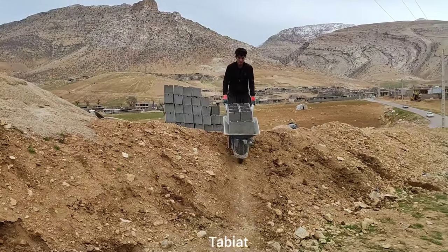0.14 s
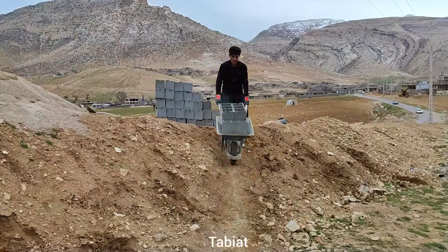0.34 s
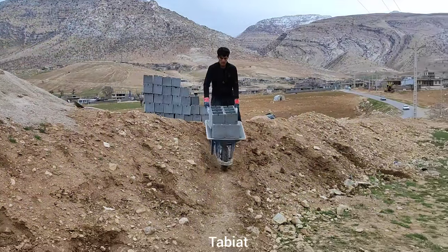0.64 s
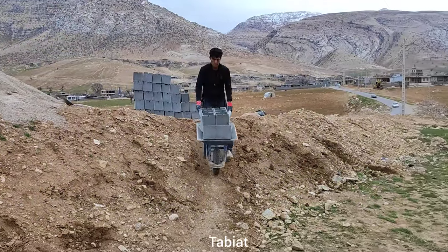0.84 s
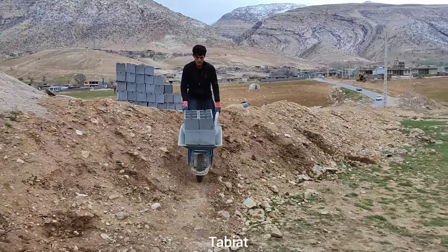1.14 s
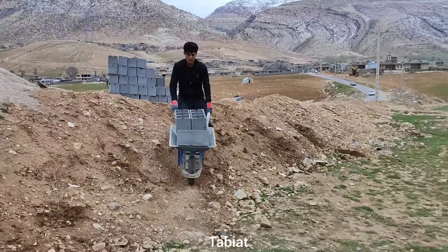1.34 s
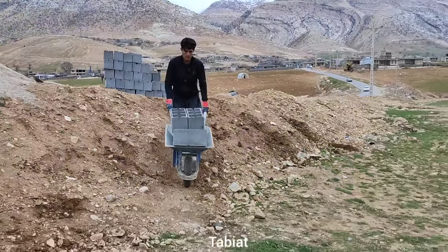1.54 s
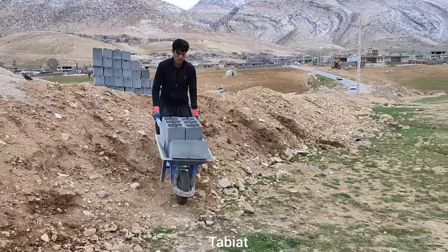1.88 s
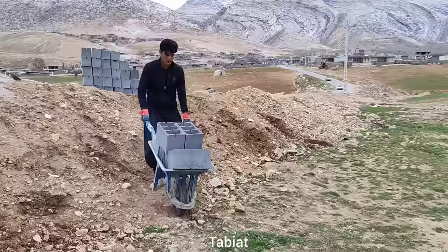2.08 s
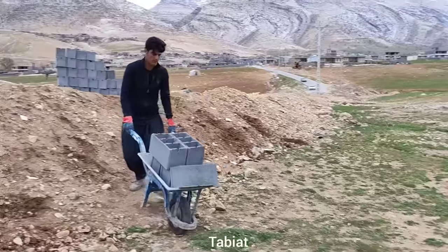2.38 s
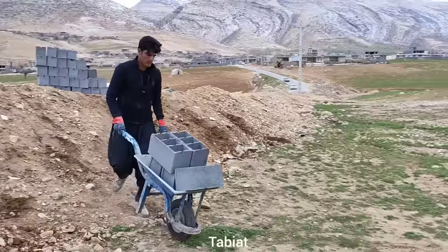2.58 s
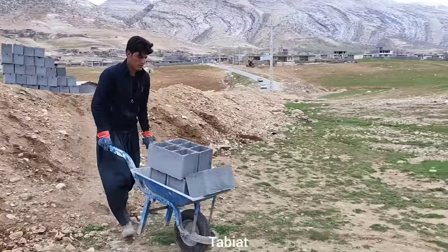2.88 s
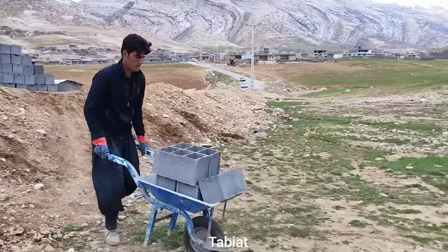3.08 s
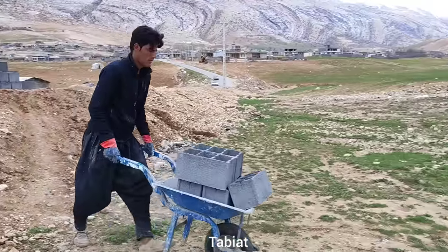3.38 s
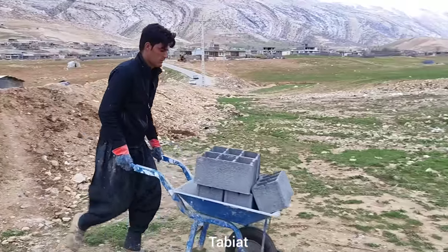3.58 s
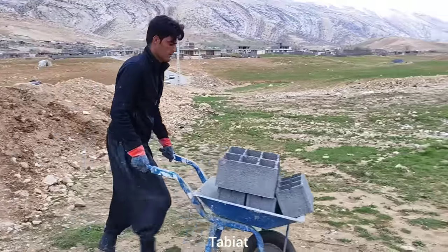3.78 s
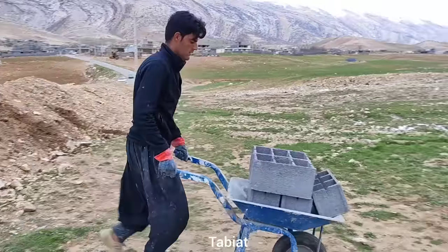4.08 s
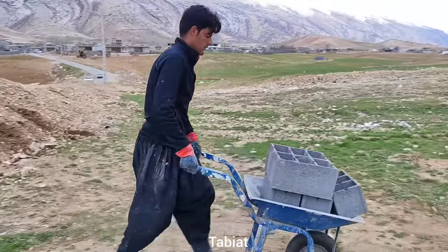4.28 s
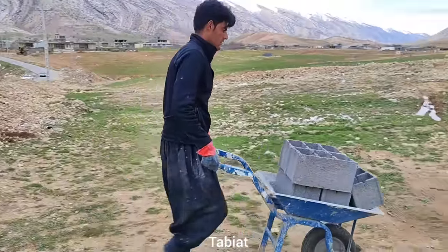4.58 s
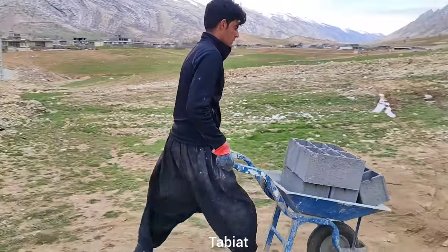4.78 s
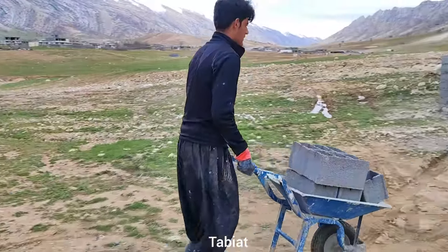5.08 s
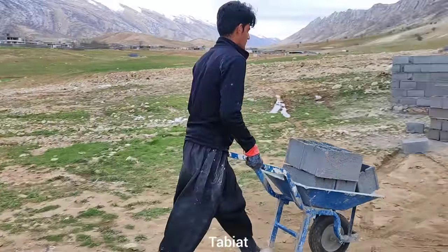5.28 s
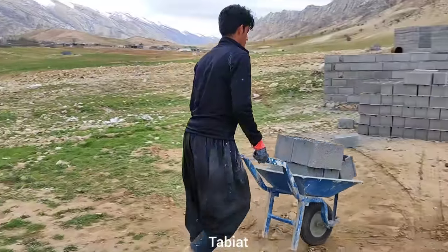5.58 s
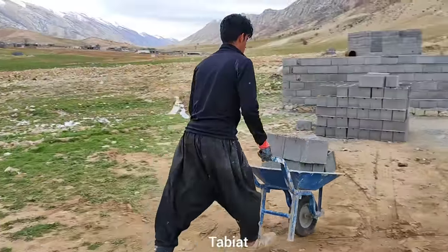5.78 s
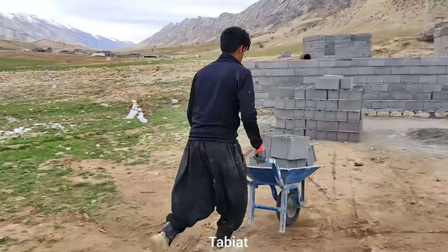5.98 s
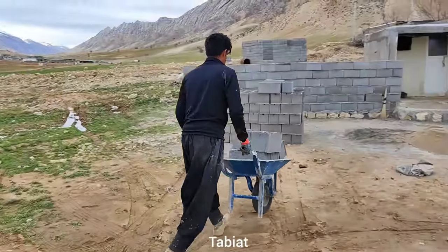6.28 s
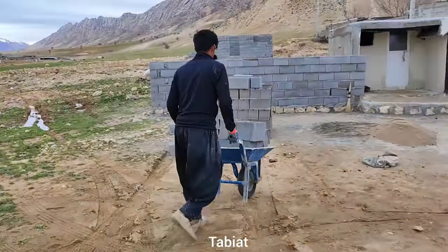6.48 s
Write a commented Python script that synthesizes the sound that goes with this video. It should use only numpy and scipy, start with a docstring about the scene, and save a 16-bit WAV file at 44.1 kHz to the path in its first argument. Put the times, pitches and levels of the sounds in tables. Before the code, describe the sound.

Outdoors in an open valley, a metal wheelbarrow of concrete blocks rolls over stony dirt. Blocks bang and grind in hard clusters early on, loudest just before three seconds with sharp grit snaps, then quieter rolling and shoe scuffs, a few knocks around four and a half, and a last clank at the end. Low wind thumps the right channel of a nearby handheld stereo microphone.

```python
"""On a windy dirt bank, a steel wheelbarrow full of concrete blocks is pushed down past the microphone.
The blocks grind, knock, rebound and rattle: noise bursts and ringing tones shake a model of the tray.
Grit snaps and scuffs under tyre and shoes as shaped noise, and a loose steel part pings as fading tones.
Gusts of noise buffet the right microphone port, over a faint open-air wash of slowly wavering noise."""
import sys
import numpy as np
from scipy import signal
from scipy.fft import rfft, irfft, next_fast_len
from scipy.io import wavfile
from scipy.ndimage import map_coordinates

SR = 44100
rng = np.random.default_rng(int(sys.argv[2]) if len(sys.argv) > 2 else 0)


def to_wav(sig):
    """Store sig (one row per channel, or 1-D mono) as 16-bit WAV at the path in sys.argv[1].

    Samples outside -1..1 are clipped; the rate is SR.
    """
    pcm = np.clip(np.atleast_2d(sig), -1, 1) * 32767
    pcm = np.round(pcm).astype(np.int16)
    wavfile.write(sys.argv[1], SR, pcm.T)  # frames by channels


N = 292506  # length in samples


def amp(db):
    """Turns dB into a plain factor."""
    return 10 ** (np.asarray(db) / 20)


def unit(x):
    """Scales to rms 1."""
    return x / np.sqrt(np.mean(x ** 2) + 1e-20)


def read(points, hz):
    """Reads a spectrum table on a log-frequency axis."""
    f, value = np.transpose(points)
    return np.interp(np.log(hz + 1), np.log(f + 1), value)


def curves(rows):
    """Draws each column of a time table as a line with a value at every sample."""
    s, *columns = np.transpose(rows)
    return [np.interp(np.arange(N) / SR, s, c) for c in columns]


def add(mix, s, sound):
    """Mixes a stereo sound in at time s."""
    start = max(round(s * SR), 0)
    part = mix[:, start:][:, :sound.shape[1]]
    part += sound[:, :part.shape[1]]


def drift(hz):
    """Slow random wandering of rms 1, up to about hz."""
    f = np.fft.rfftfreq(N, 1 / SR)
    slow = rfft(rng.standard_normal(N)) * np.exp(-(f / hz) ** 2)
    return unit(irfft(slow, N))


def fade(t, t60):
    """Exponential decay, 60 dB down at t60 seconds."""
    return np.exp(-np.log(1000) * t / t60)


# how alike the two microphone ports hear a sound: [f/Hz, likeness (1 = the same, 0 = unrelated)]
PORT_LIKENESS = [(50, .8), (300, .97), (700, .97), (1400, .7), (3000, .3), (6000, .1), (15000, .1)]


def colour(x, spectrum, tilt_db=0):
    """Gives two unrelated signals a spectrum and the likeness of the two ports; rms 1."""
    size = next_fast_len(x.shape[1])
    hz = np.fft.rfftfreq(size, 1 / SR)
    a, b = rfft(x, size)
    same = np.clip(read(PORT_LIKENESS, hz), -1, 1)
    mid, side = a * np.sqrt(1 + same), b * np.sqrt(1 - same)
    gain = amp(read(spectrum, hz) + tilt_db * np.log2(1 + hz / 1000))
    stereo = irfft(np.array([mid + side, mid - side]) * gain, size)
    return unit(stereo[:, :x.shape[1]])


def hiss(size, spectrum, tilt_db=0, ripple_db=0):
    """Coloured stereo noise; ripple gives each burst chance peaks and dips of its own."""
    knots = np.geomspace(200, SR / 2, num=90)
    ripple = np.interp(np.fft.rfftfreq(size, 1 / SR), knots, rng.standard_normal(len(knots)))
    noise = rfft(rng.standard_normal((2, size))) * amp(ripple_db * ripple)
    return colour(irfft(noise, size), spectrum, tilt_db)


def grains(per_s, spread_db):
    """Tiny impacts at random times and of random sizes."""
    size = amp(spread_db * np.minimum(rng.exponential(1, N), 4))
    happens = rng.random(N) < per_s / SR
    return size * happens * rng.standard_normal((2, N))


def patter(per_s, spread_db, t60):
    """The envelope of small random impacts, each dying away; rms 1."""
    hits = amp(spread_db * rng.standard_normal(N)) * (rng.random(N) < per_s / SR)
    return unit(signal.oaconvolve(hits, fade(np.arange(SR // 4) / SR, t60))[:N])


def ring(modes, t, scatter_db, detune=0):
    """One strike sets off fading tones of chance strength and pitch; high ones reach the ports out of step."""
    hz, db, t60 = np.transpose(modes)[:, :, None]
    share, sign, skew, shift = rng.standard_normal((4, len(hz), 1))
    strength = np.sign(sign) * amp(db + scatter_db * share)
    pitch = hz * (1 + detune * shift)
    waves = strength * fade(t, t60) * np.exp(2j * np.pi * pitch * t)
    # half of the phase gap between the ports
    half = np.sign(skew) * np.arccos(np.clip(read(PORT_LIKENESS, hz), -1, 1)) / 2
    return (np.exp(1j * half * [1, -1]).T @ waves).imag


# colour of the open-air wash: [f/Hz, relative level/dB]
AIR_COLOUR = [(20, -23.5), (100, 18.5), (250, 8), (430, -14), (800, 3.5), (1200, -1), (1900, -3),
              (2800, -24), (5000, -27.5), (10000, -32), (14500, -11.5)]
# strength of the wash before it wavers: [t/s, level/dB]
AIR_LEVEL = [(0, -48.5), (1.5, -46.5), (3, -47.5), (4.2, -50.5), (5.2, -54), (6, -46), (6.63, -50)]


def air(waver_db=1):
    """The distant wash of the open valley: noise whose level wavers slowly."""
    return amp(curves(AIR_LEVEL)[0] + waver_db * drift(hz=6.9)) * hiss(N, AIR_COLOUR)


# wind eddies at a port, before the wind speed shifts their pitch: [f/Hz, relative level/dB]
EDDIES = [(10, -31), (30, -12.5), (65, 2.5), (115, 2.5), (180, -2.5), (260, -12), (400, -25), (700, -34.5),
          (1500, -39), (4000, -100)]


def buffet(level_db, lumpy_db, quicken, pace):
    """Eddies cross one port; a stronger puff sweeps them by faster, so it is both louder and sharper."""
    puff = unit(amp(lumpy_db * drift(hz=131))) * amp(level_db)
    speed = pace * (puff / amp(-30)) ** quicken
    eddies = unit(hiss(N, EDDIES)[0])
    place = np.cumsum(speed) % (N - 1)
    return puff * map_coordinates(eddies, [place], order=1)


# wind strength at the right port, before its swells: [t/s, level/dB]
GUSTS = [(0, -37.5), (.13, -21), (.37, -34), (.46, -24), (.93, -29.5), (1.15, -23), (1.5, -34), (1.98, -31),
         (2.12, -48), (3.2, -43.5), (3.45, -36), (3.76, -38), (3.92, -32), (4.2, -52.5), (4.62, -45.5),
         (4.87, -32), (5.35, -27), (5.8, -28), (6.15, -24.5), (6.63, -27.5)]
# the hardest puffs within the gusts, before puff_db is added: [t/s, level over the gust/dB]
PUFFS = [(0.116, 4), (.272, 10.5), (0.5, 6), (5.177, 3.5), (5.251, 8.5), (6.026, 11), (6.144, 7.5),
         (6.18, 11.5), (6.253, 9.5), (6.342, 6.5)]
# weaker puffs come at random: how many per second, and level over the gust (dB, before puff_db)
EDDY_PUFFS_PER_S, EDDY_PUFF_DB = 4.9, 1.5
# the sheltered left port: level in a -30 dB gust (dB), share of the wind's swings that it follows
LEE_DB, LEE_FOLLOWS = -49, .3


def wind(right_db=0, swell_db=1.5, puff_db=5, puff_width=0.0016):
    """The right port faces the wind, more squarely as the microphone turns; the left is sheltered."""
    # [t/s, factor on the eddy speed]
    facing, = curves([(0, 0.76), (1.5, 1), (4, 1.), (5.2, 1.116), (6.1, 1.38), (6.63, 1.12)])
    t = np.arange(N) / SR
    gust_db = curves(GUSTS)[0] + swell_db * drift(hz=9)
    lee_db = LEE_DB + LEE_FOLLOWS * (gust_db + 30)
    left = buffet(lee_db, lumpy_db=2.5, quicken=0.15, pace=1.0)
    right = buffet(gust_db + right_db, lumpy_db=2.5, quicken=.28, pace=facing)
    weak = [(s, EDDY_PUFF_DB) for s in t[rng.random(N) < EDDY_PUFFS_PER_S / SR]]
    for s, db in PUFFS + weak:
        # a tight vortex passing the port: one pressure spike between two dips
        near = abs(t - s) < .02
        u = (t[near] - s) * facing[near] / puff_width
        spike = (1 - 2 * u ** 2) * np.exp(-u ** 2)
        right[near] += amp(gust_db[near] + db + puff_db) * spike
    return np.array([left, right])


# shoes landing: [t/s, level/dB before the clap fades]
STEPS = [(3.49, -35.5), (4.435, -24), (4.44, -24.5)]
# dull colour of a sole on earth: [f/Hz, relative level/dB]
SOLE = [(60, -14), (250, 4), (500, -24), (850, 0.5), (1400, -20), (2500, -22), (6000, -53), (14000, -58)]


def steps(t60=0.025):
    """Short dull claps of a sole on packed earth: noise bursts that fade fast."""
    out, t = np.zeros((2, N)), np.arange(SR // 8) / SR
    for s, db in STEPS:
        add(out, s, amp(db) * fade(t, t60) * hiss(len(t), SOLE))
    return out


# shoes scuffing through loose soil: [start t/s, length/s, level/dB at the middle, before flutter]
SCUFFS = [(1.46, 0.082, -49), (3.336, 0.15, -71), (3.58, .14, -54), (3.845, 0.13, -47.5),
          (4.544, 0.072, -65), (5.13, 0.076, -51.5), (5.311, 0.072, -51), (5.75, 0.27, -57)]
# colour of crushed grit, shared by scuffs, snaps and rolling: [f/Hz, relative level/dB before tilt]
GRIT = [(150, -3.5), (600, 3.5), (1500, 3.5), (2600, 4), (4500, 3.5), (6500, 4), (9500, -5), (12000, 3),
        (14500, -8)]


def scuffs(flutter_db=3):
    """A sole drags through loose soil: a swell of crushed grains."""
    t = np.arange(N) / SR
    drag = sum(amp(db) * np.sin(np.pi * np.clip((t - s) / length, 0, 1)) for s, length, db in SCUFFS)
    flutter = amp(flutter_db * drift(hz=40))
    soil = colour(grains(per_s=6500, spread_db=3.0), GRIT, tilt_db=-6.5)
    return drag * flutter * soil


# strikes on the loose steel part, before level_db is added: [t/s, level/dB]
PINGS = [(1.231, -51), (1.525, -50), (1.70, -47.5), (1.965, -47.5), (2.08, -52), (3.685, -47), (4.784, -38),
         (4.945, -54.5), (5.198, -39.5), (5.69, -54)]
# tones of the steel part: [f/Hz, relative level/dB, time to fade 60 dB/s]
STEEL = [(2330, 7, 0.26), (2345, 6, 0.18), (2514, 3, 0.17), (2710, 0, 0.071), (3000, 2, 0.069),
         (4000, -6, 0.087)]


def pings(scuff_t60=0.021, scuff_db=-17, level_db=-2):
    """A loose steel part is tapped and briefly rubbed: a click and a short scrape set off its tones."""
    out, t = np.zeros((2, N)), np.arange(SR // 3) / SR
    for s, db in PINGS:
        touch = amp(scuff_db) * rng.standard_normal(len(t)) * fade(t, scuff_t60)
        touch[0] = 1  # the tap itself
        steel = ring(STEEL, t, scatter_db=1.5)
        struck = signal.fftconvolve(steel, touch[None], axes=1) / np.linalg.norm(touch)
        add(out, s, amp(db + level_db) * struck)
    return out


# pebbles snapping under tyre and shoes: [t/s, level/dB before shaping, treble tilt/dB per octave]
SNAPS = [(.011, -35.5, -1.5), (0.574, -31.5, -6), (.681, -39, -6.5), (.706, -32.5, -2.5), (.924, -43.5, 2),
         (1.195, -28.5, -2), (1.339, -46, 4), (1.417, -39.5, -2.5), (1.601, -39, -2), (2.007, -41, 2),
         (2.205, -48.5, -0.5), (2.359, -33.5, -2.5), (2.449, -22, 3), (2.819, -24, -0.5), (2.866, -22, 8),
         (2.91, -11.5, 10.5), (3.013, -37, 4), (3.074, -31.5, 5), (3.292, -38, -2), (3.552, -46, 9),
         (3.838, -36.5, 3.5), (4.389, -40, -9), (4.65, -40.5, -3.5), (4.780, -34.5, -6), (4.899, -41, -1),
         (5.199, -43, -7), (5.297, -35.5, 0.5), (5.443, -47, -5.5), (5.696, -51, 4), (6.359, -45.5, -3),
         (6.425, -43.5, -6.5)]
SNAP_T60 = 0.084  # time for the main burst to fade 60 dB (s)


def snaps(rise=0.001, tail_db=-22, tail_t60=0.13):
    """A pebble bursts and its crumbs scatter: a noise burst with a weak longer tail."""
    out, t = np.zeros((2, N)), np.arange(SR // 4) / SR
    shape = (1 - np.exp(-t / rise)) * (fade(t, SNAP_T60) + amp(tail_db) * fade(t, tail_t60))
    for s, db, tilt in SNAPS:
        add(out, s, amp(db) * shape * hiss(len(t), GRIT, tilt, ripple_db=4.5))
    return out


# tones of the loaded tray: [f/Hz, relative level/dB, time to fade 60 dB/s]
TRAY = [(150, -15.5, 0.22), (206.4, -2.5, 0.075), (236, -10.5, 0.12), (280.3, -2.5, 0.19), (296, -4, 0.053),
        (382.4, -5, 0.26), (443, -25, 0.13), (493, -23, .25), (603, -1, 0.26), (654, 3, 0.15),
        (676, 1, 0.2), (759.5, 3, 0.14), (812, -12.5, 0.35), (835, -7, 0.32), (887.7, -0.5, 0.18),
        (954, -10.5, 0.33), (1030, -40, .18), (1258, -11, 0.33), (1322, -10, 0.25), (1424, -19, 0.57),
        (1740, -30, 0.25), (1980, -21, 0.097), (2357, -12.5, 0.19), (4120, -16, 0.16), (5430, -10, 0.2)]
# dense ring of blocks and frame: [f/Hz, relative level/dB]
CLATTER = [(40, -53), (100, -14.5), (200, -3), (300, 10), (500, 1.5), (700, 6), (900, 1), (1120, -10),
           (1400, -4.5), (2300, -2), (3100, -7.5), (4200, -13.5), (7000, -39), (14000, -31)]


def shaken(per_s, spread_db, modes_db, soft_db):
    """Small jolts shake tray and load; the softer they are, the less they wake the high modes. Rms 1."""
    jolts, t = grains(per_s, spread_db), np.arange(SR // 3) / SR
    modes = [(hz, db - soft_db * np.log2(1 + hz / 1000), t60) for hz, db, t60 in TRAY]
    sung = signal.oaconvolve(jolts[:1], ring(modes, t, scatter_db=-4), axes=1)[:, :N]
    return unit(amp(modes_db) * unit(sung) + colour(jolts, CLATTER, -soft_db / 2))


# strength of the rolling, set by speed, ground and distance: [t/s, level/dB before each part's own level]
ROLL = [(0, -42), (.15, -62), (.55, -54.5), (.8, -50), (1.15, -44), (1.35, -47.5), (2.05, -43),
        (2.28, -50.5), (2.42, -39.5), (3.05, -34), (3.25, -45), (3.55, -46), (3.8, -55), (4.25, -56.5),
        (4.65, -43), (5.05, -53.5), (5.35, -53), (5.7, -56.5), (6.3, -57), (6.5, -41.5)]
# the load rattles on after a knock: level against the clank (dB), time to settle by 60 dB (s)
RATTLE_DB, SETTLE_T60 = -19.5, 0.19
CRUNCH_DB = -11.5  # soil under the tyre, against the rolling strength (dB, before flutter)
# smaller grit cracks at random: how many per second, level against the rolling (dB), spread of sizes (dB)
GRIT_PER_S, GRIT_DB, GRIT_SPREAD_DB = 27, -16.5, 1.5
# now and then a block shifts with a small tap: how many per second, level against the rolling (dB)
TAPS_PER_S, TAPS_DB = 20, -6.5


def rolling(rumble_flutter_db=0.3, crunch_flutter_db=3.5, rumble_db=-2):
    """The lumpy ground jiggles the load and crushes soil in step; grit cracks, and knocks leave a rattle."""
    t, roll, lumps = np.arange(N) / SR, amp(curves(ROLL)[0]), drift(hz=28)
    rattle_power = sum(amp(clank + RATTLE_DB) ** 2 * (t > s) * fade(abs(t - s), SETTLE_T60) ** 2
                       for s, clank, _, _ in KNOCKS)
    rattle = rattle_power ** .5
    soil = colour(grains(per_s=5400, spread_db=-2.5), GRIT, tilt_db=-6.5)
    load = shaken(per_s=550, spread_db=1, modes_db=-5.5, soft_db=10.5)
    cracks = patter(GRIT_PER_S, GRIT_SPREAD_DB, t60=0.072) * hiss(N, GRIT, tilt_db=-0.5)
    taps = patter(TAPS_PER_S, spread_db=1.6, t60=0.057) * hiss(N, CLATTER, tilt_db=-1)
    crunch = amp(CRUNCH_DB + crunch_flutter_db * lumps) * soil
    small = crunch + amp(GRIT_DB) * cracks + amp(TAPS_DB) * taps
    shake = np.hypot(amp(rumble_db) * roll, rattle) * amp(rumble_flutter_db * lumps)
    return shake * load + roll * small


# concrete faces grinding as the load shifts: [t/s of the strongest moment, level/dB of the force]
GRINDS = [(.725, -38.5), (.772, -31.5), (1.025, -31), (1.655, -41), (1.885, -51), (2.46, -27),
          (2.682, -27.5), (2.887, -20), (3.307, -44.5), (4.41, -50), (4.735, -36), (4.855, -48),
          (6.49, -46.5), (6.62, -61)]
GRIND_RISE_S, GRIND_FALL_S = 0.018, 0.037  # time constants of the swell and the fall (s)
# crack of concrete on concrete, shared by grinds and knocks: [f/Hz, relative level/dB]
CRACK = [(200, -45.5), (1000, 7), (2300, 14), (3200, -0.5), (4000, 8), (4900, 2.5), (6000, 3.5), (9000, -7),
         (11200, -4), (13000, 1.5), (14500, -10)]


def grinds(body_db=0, rasp_db=-2):
    """Rough faces slide: a rasp of breaking grains that comes with a shaking of the tray."""
    t = np.arange(N) / SR
    force = sum(amp(db) * np.exp(-np.maximum((s - t) / GRIND_RISE_S, (t - s) / GRIND_FALL_S))
                for s, db in GRINDS)
    rasp = colour(grains(per_s=12000, spread_db=-0.5), CRACK)
    body = shaken(per_s=4000, spread_db=0.5, modes_db=-9, soft_db=4.5)
    return force * (amp(rasp_db) * rasp + amp(body_db) * body)


def block(t, t60=0.074, count=28):
    """A hollow block clinks; every contact wakes other modes, and the high ones die first."""
    hz = rng.uniform(2000, 13000, count)
    modes = np.transpose([hz, read(CRACK, hz), t60 * (4000 / hz) ** .4])
    return ring(modes, t, scatter_db=2)


# blocks knocking in the tray, before each part's own level is added:
# [t/s, clank level/dB, boom of the tray floor level/dB, crack level/dB]
KNOCKS = [(.776, -15.5, -14, -25), (.793, -24, -20, -24), (1.031, -10.5, -12, -20), (1.049, -31, -12, -23),
          (1.072, -23.5, -21, -31.5), (1.147, -26.5, -38, -81), (1.641, -35, -24, -43),
          (1.668, -32, -28, -41), (1.885, -22.5, -29, -32.5), (1.890, -26.5, -15.5, -26.5),
          (2.43, -32, -24, -34), (2.455, -13, -51, -21), (2.464, -17, -3, -20.5), (2.676, -28, -16, -31.5),
          (2.692, -17, -8, -23), (2.825, -24.5, -37.5, -48), (2.874, -21.5, -30, -42),
          (2.897, -12.5, -14.5, -26), (2.913, -15, -12, -14.5), (2.932, -19.5, -23.5, -40.5),
          (2.96, -25.5, -30.5, -49.5), (3.325, -44.5, -28, -36), (3.43, -44, -47.5, -48.5),
          (3.948, -39.5, -49, -49), (4.511, -21.5, -21.5, -34), (4.532, -27, -30, -57),
          (4.716, -22, -19, -34), (6.494, -18, -46, -32), (6.502, -29.5, -9, -36), (6.610, -40, -45, -29.5)]
# a knocked block rebounds: typical first flight (s), share of it left for the next,
# chance spread of a flight (log units), level change per rebound (dB)
FLIGHT_S, RESTITUTION, FLIGHT_SPREAD, REBOUND_DB = .018, 1, .25, -10


def blows(count=3):
    """Each knock and its ever weaker rebounds, after flights of chance length: t/s and three levels/dB."""
    chance, k = rng.standard_normal((len(KNOCKS), count)), np.arange(count)
    for (s, *levels), luck in zip(KNOCKS, chance):
        flights = FLIGHT_S * RESTITUTION ** k * np.exp(FLIGHT_SPREAD * luck)
        delays = np.cumsum(flights) - flights  # the first blow comes at once
        for delay, loss in zip(delays, REBOUND_DB * k):
            yield s + delay, *(np.array(levels) + loss)


def knocks(modes_db=-9, clatter_db=-2, clatter_t60=0.11, crack_db=-3, crack_t60=0.047,
           clink_db=-19, tail_db=-22, tail_t60=0.66, contact=0.00096):
    """Each knock cracks, clinks a block, rings the tray and leaves a faint shiver of the whole load."""
    out, t = np.zeros((2, N)), np.arange(SR // 3) / SR
    tail = amp(tail_db) * fade(t, tail_t60)
    press = 1 - np.exp(-t / contact)  # the rough faces crush before they bear
    for s, clank, boom, crack in blows():
        # heavy blows drive the low modes, hard ones the high
        weight = [(330, boom), (600, clank), (1200, clank), (5000, crack)]
        modes = [(hz, db + read(weight, hz), t60) for hz, db, t60 in TRAY]
        dense = [(hz, db + read(weight, hz)) for hz, db in CLATTER]
        tray = amp(modes_db) * ring(modes, t, scatter_db=1.0, detune=0.0098)
        clatter = hiss(len(t), dense, ripple_db=4.5) * (fade(t, clatter_t60) + tail)
        tray += amp(clank + clatter_db) * clatter
        stone = amp(crack_db) * hiss(len(t), CRACK, ripple_db=6.0) * (fade(t, crack_t60) + tail)
        stone += amp(clink_db) * block(t)
        add(out, s, press * (tray + amp(crack) * stone))
    return out


# how much louder the left port hears the barrow than the right: [f/Hz, level difference/dB]
LEAN = [(60, 27), (200, -2), (370, 1), (680, 3.5), (1260, 5), (2310, -3), (4250, 1), (7800, -2),
        (14400, -4.5)]


def scene(lag=.00008, radiate_hz=110):
    """The barrow, heard a little sooner at the left port, and the weather."""
    hz = np.fft.rfftfreq(N, 1 / SR)
    barrow = knocks() + grinds() + snaps() + scuffs() + pings() + steps() + rolling()
    # a small open tray radiates little bass
    bass_cut = signal.butter(2, radiate_hz, "high", fs=SR, output="sos")
    barrow = signal.sosfilt(bass_cut, barrow)
    balance = amp(np.outer([.5, -.5], read(LEAN, hz)))
    delay = np.exp(-2j * np.pi * np.outer([0, lag], hz))  # lag in s, right port only
    return irfft(rfft(barrow) * balance * delay, N) + air() + wind()


# colour of the microphone ports: [f/Hz, level/dB]
PORTS = [(20, 0), (6800, -1), (7500, -7), (8000, -12.5), (8500, -3), (9200, 5.5), (14000, -12),
         (15000, -18.5)]
EDGE_HZ = 14700  # top of the band (Hz)


def record(dry):
    """The ports cut a notch in the treble; then a low-pass filter limits the band."""
    hz = np.fft.rfftfreq(N, 1 / SR)
    heard = irfft(rfft(dry) * amp(read(PORTS, hz)), N)
    low_pass = signal.firwin(401, EDGE_HZ, window=("kaiser", 9), fs=SR)
    return signal.oaconvolve(heard, low_pass[None], "same")


dry = scene()
out = record(dry)
to_wav(out)
```